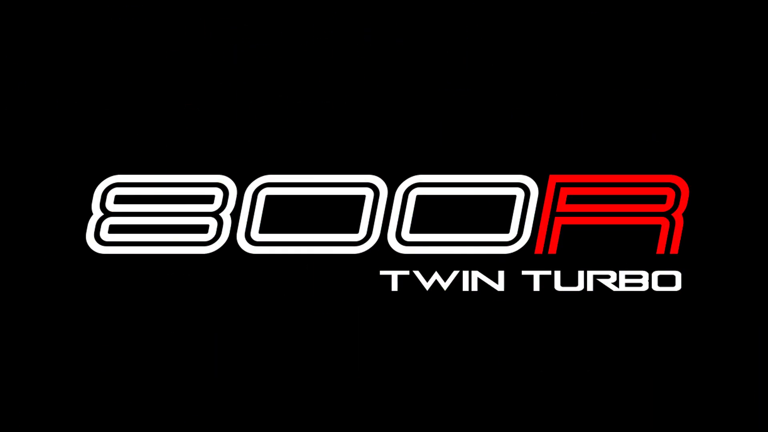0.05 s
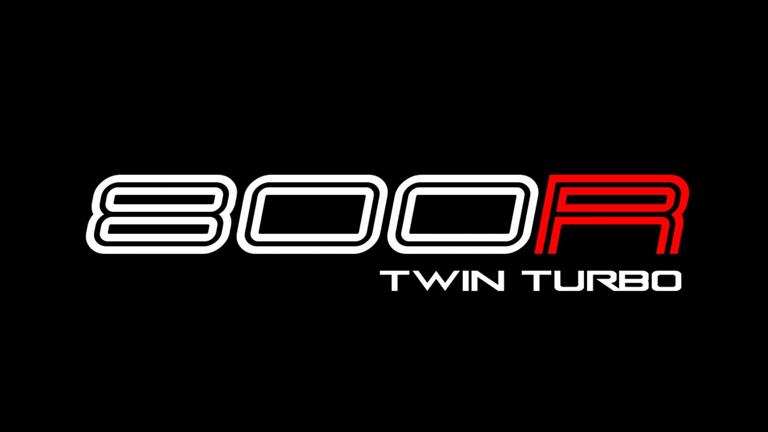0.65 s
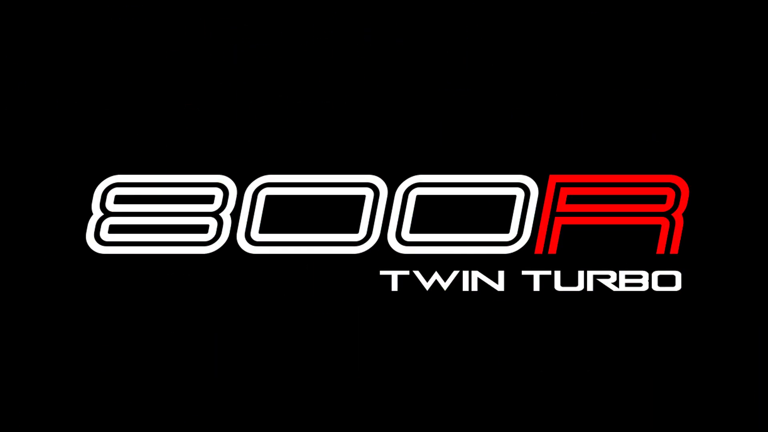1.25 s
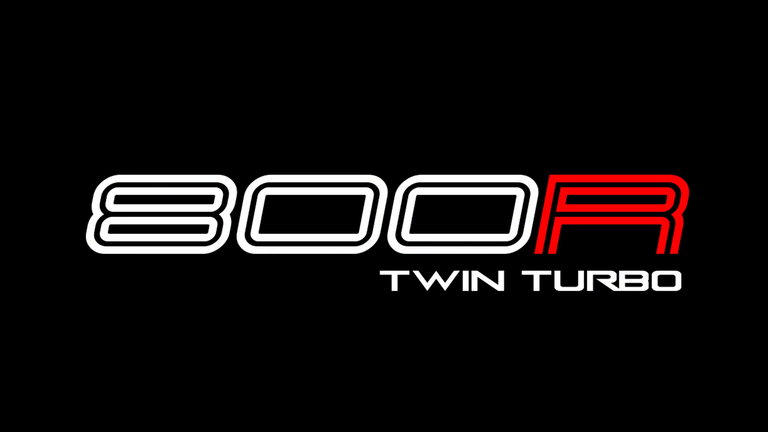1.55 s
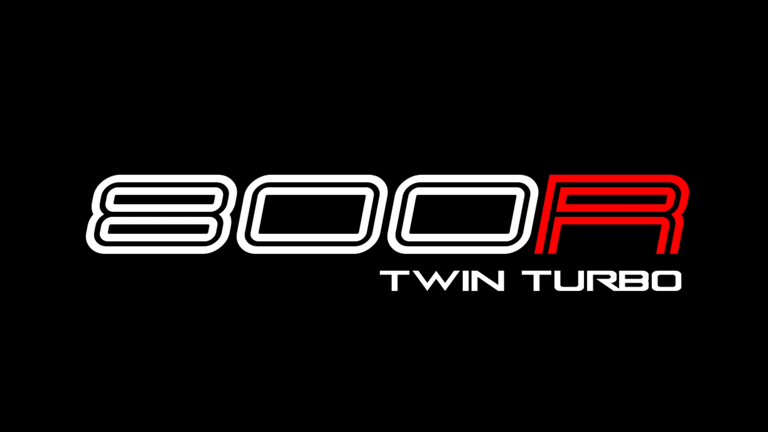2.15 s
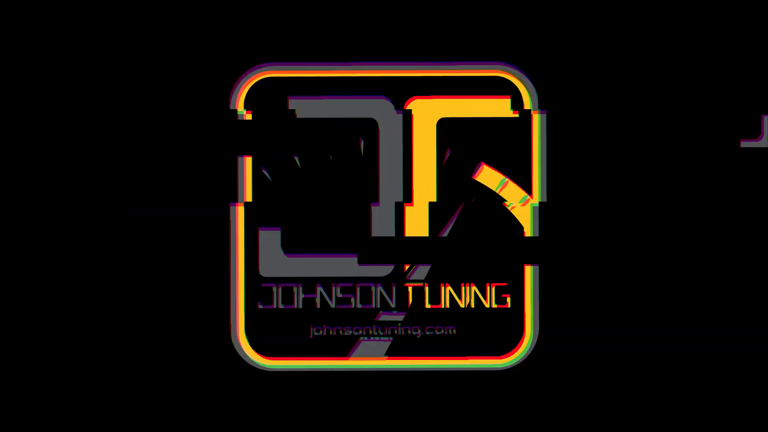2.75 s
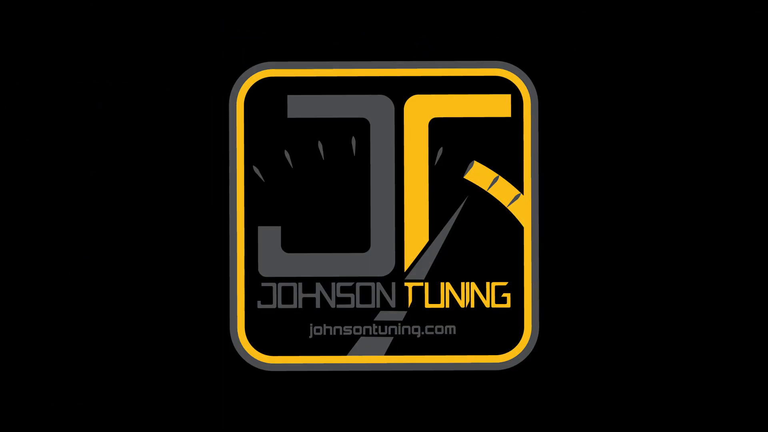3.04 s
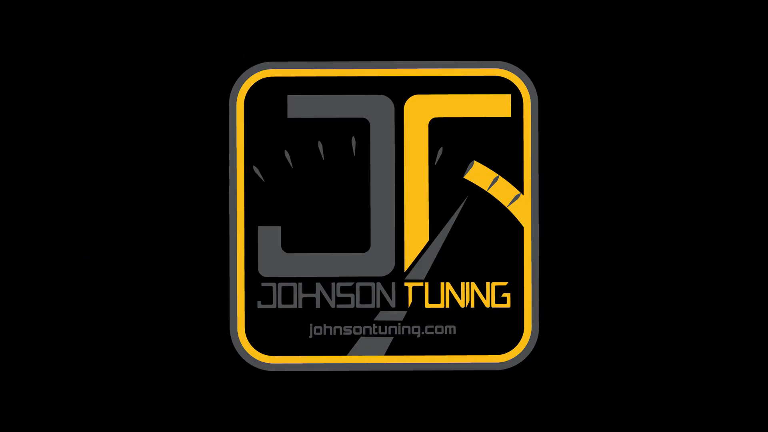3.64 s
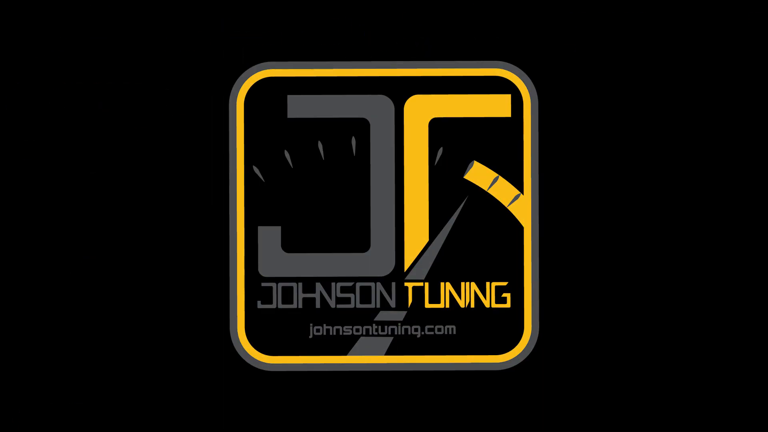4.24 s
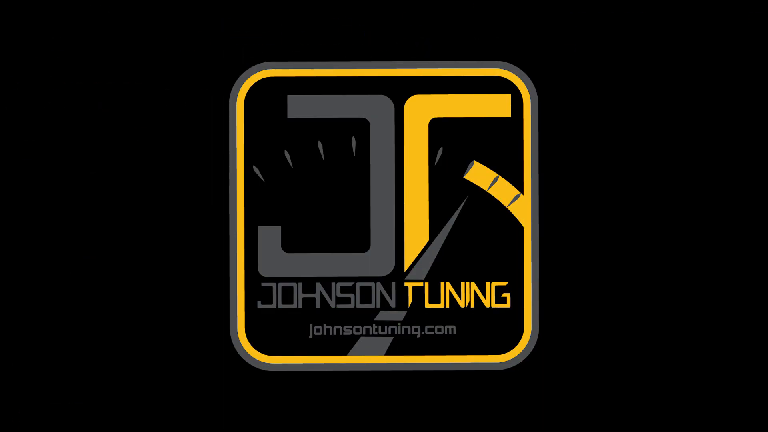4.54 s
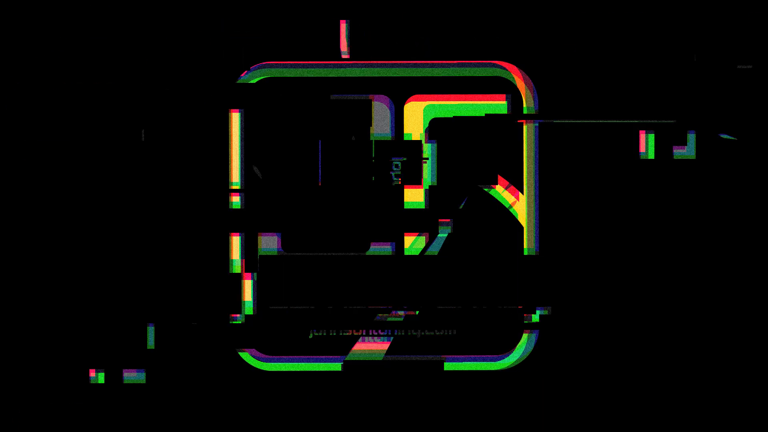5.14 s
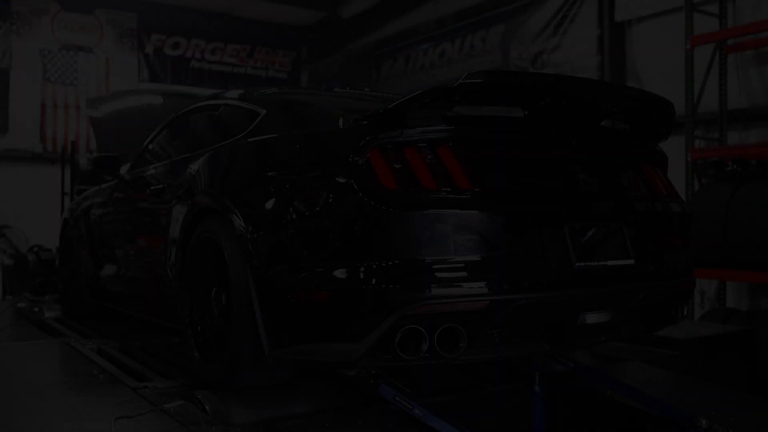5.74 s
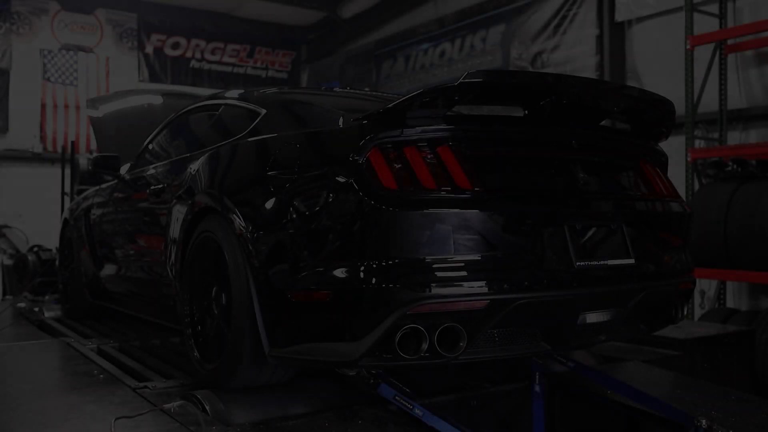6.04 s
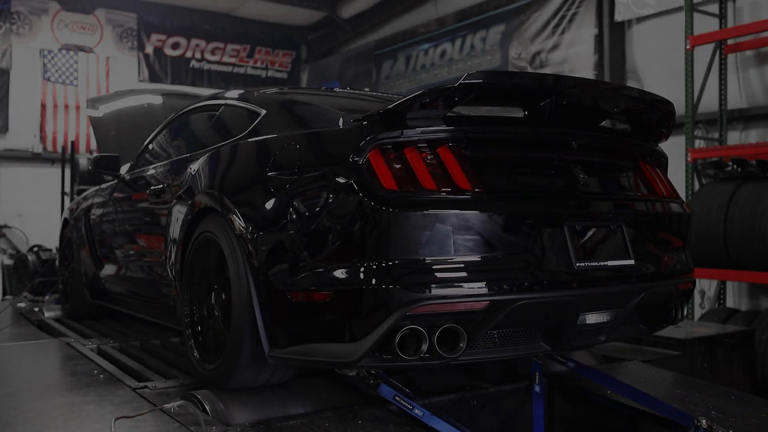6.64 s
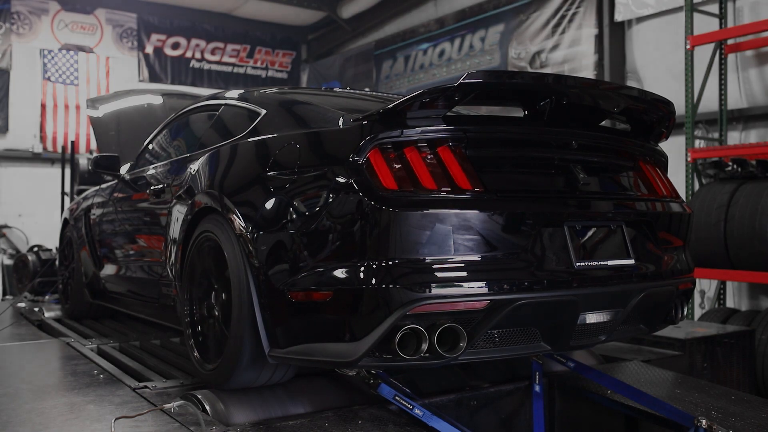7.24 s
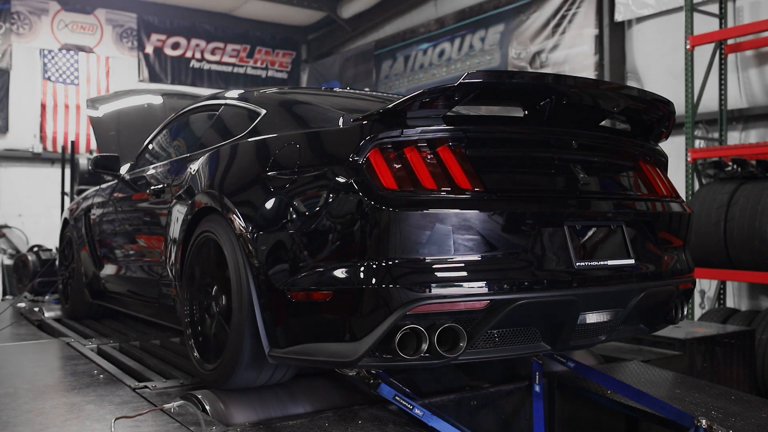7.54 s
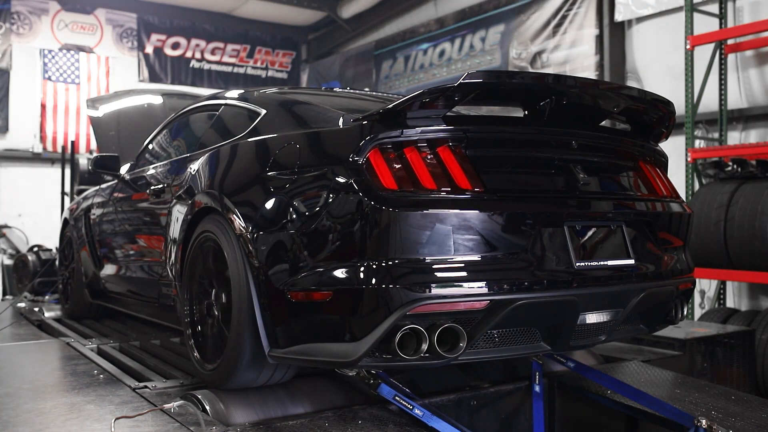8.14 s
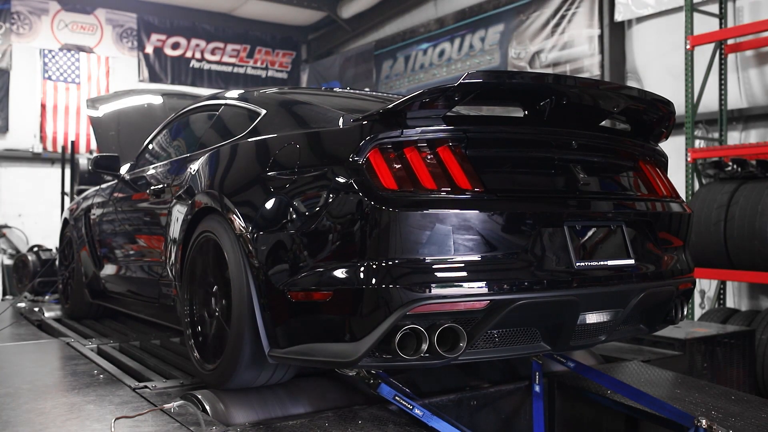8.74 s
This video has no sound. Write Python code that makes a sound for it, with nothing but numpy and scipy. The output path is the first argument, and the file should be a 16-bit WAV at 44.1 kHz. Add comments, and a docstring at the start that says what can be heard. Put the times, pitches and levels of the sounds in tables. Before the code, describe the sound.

A turbocharged V8 car runs on a workshop dyno, heard close behind the tailpipes. It climbs from a low burble to a barking roar, then lifts off with a whoosh of boost and three pops. A second, longer pull ends in a big backfire that overloads the microphone. The engine then settles to a light load and drops lower, while tyres whine on the rollers and the turbos whistle faintly.

```python
"""A turbocharged V8 lugs at low revs, then pulls hard twice on a workshop dyno, heard behind the tailpipes.
Its firing pulses make a deep, burbling note and ring the pipes into a bark and a metallic rasp.
Each throttle lift stumbles and vents boost; on the first two, fuel pops in the pipes, once as a big backfire.
Then it settles to a light load. Underneath, tyres whine on the rollers and the turbos whistle faintly.
The loudest peaks overload the microphone."""
import sys
import numpy as np
from scipy import signal
from scipy.fft import rfft, irfft, next_fast_len
from scipy.io import wavfile
from scipy.ndimage import uniform_filter1d

SR = 44100
rng = np.random.default_rng(int(sys.argv[2]) if len(sys.argv) > 2 else 0)


def master(y):
    """Save y as 16-bit WAV."""
    cut = np.clip(np.atleast_2d(y).T, -1, 1)
    pcm = np.round(cut * 32767)  # scale
    wavfile.write(sys.argv[1], SR, pcm.astype(np.int16))


N = 396459
TIME = np.arange(N) / SR

# how hard the engine works: (time [s], low note level [dB], bark level [dB])
ENGINE_EFFORT = [(0, -32.5, -33), (.25, -29, -31), (.5, -19, -27), (.72, -12.5, -17), (.95, -13.5, -15),
                 (1.1, -11.5, -13), (1.25, -8.5, -5.5), (1.42, -6.5, -11), (1.65, -11, -12.5),
                 (1.92, -13.5, -13.5), (2.03, -21, -26), (2.48, -26, -30), (2.62, -17.5, -25),
                 (3.0, -19, -27.5), (3.2, -15.5, -21), (3.35, -14.5, -22.5), (3.65, -11.5, -14),
                 (4.05, -10.5, -16), (4.55, -11.5, -15), (5.32, -16, -16), (5.47, -19, -26),
                 (5.85, -20, -34.5), (5.99, -14, -18.5), (6.3, -21, -30.5), (6.6, -16.5, -27.5),
                 (7.3, -16, -27.5), (7.4, -27.5, -33), (7.5, -21, -31), (7.8, -29.5, -55), (8.15, -28, -41),
                 (8.42, -23, -33), (8.7, -27, -37), (8.99, -25.5, -58)]
# the eight cylinders in firing order: (pulse strength [dB], delay down the pipe [firing periods])
CYLINDER_PULSES = [(4, 0.0506), (4.5, -0.009), (-3.6, 0.048), (-1, -0.238), (6, 0.004), (-0.5, 0.042),
                   (3.5, 0.0564), (-2.8, 0.076)]


def from_db(db):
    """Decibels to gain."""
    return 10 ** (np.asarray(db) / 20)


def rms_one(x):
    """Scale to unit power."""
    return x / np.sqrt(np.mean(x ** 2) + 1e-20)


def levelled(x):
    """Hold the power at one over a tenth of a second, keeping the single pulses."""
    return x / np.sqrt(np.abs(uniform_filter1d(x ** 2, SR // 10)) + 1e-12)


def in_time(rows):
    """Each column of an automation table at every sample."""
    times, *columns = np.transpose(rows)
    return [np.interp(TIME, times, column) for column in columns]


def drift(rate_hz):
    """Smooth random wander of spread one."""
    step, settle = 40, 2000
    pole = np.exp(-2 * np.pi * rate_hz * step / SR)
    white = rng.standard_normal(N // step + settle + 2)
    slow = signal.lfilter([1], [1, -2 * pole, pole * pole], white)[settle:]
    return np.interp(np.arange(N) / step, np.arange(len(slow)), rms_one(slow))


def noise(spectrum, flow=1):
    """Turbulence at unit power that follows a flow; its colour rolls off past the last point."""
    size = next_fast_len(N)
    hz, db = np.transpose(spectrum)
    bins = np.arange(size // 2 + 1) * SR / size + 1
    colour = from_db(np.interp(np.log(bins), np.log(hz), db)) * np.minimum(1, hz[-1] / bins) ** 2
    return rms_one(irfft(rfft(rng.standard_normal(N) * flow, size) * colour, size)[:N])


def workshop(x, wet_db, t60_s=.34):
    """Direct sound plus a dense tail of wall reflections."""
    t = TIME[:SR // 2]
    tail = rng.standard_normal(len(t)) * from_db(-60 * t / t60_s) * (t > .004)
    return x + from_db(wet_db) * signal.fftconvolve(x, tail / np.linalg.norm(tail))[:N]


def whistle(hz, harmonic_db, wander_hz, rate_hz):
    """A tone and its harmonics, blurred by fast wander of the pitch."""
    phase = 2 * np.pi * np.cumsum(hz + wander_hz * drift(rate_hz)) / SR
    return np.sqrt(2) * sum(from_db(db) * np.sin(k * phase) for k, db in enumerate(harmonic_db, 1))


def dyno_rollers():
    """Two tyres roar and whine on the rollers, slightly out of tune with each other."""
    # tyres on the rollers: (time [s], whine pitch [Hz], whine level [dB], roar level [dB])
    rolling = [(0, 2360, -43, -34.5), (1, 2320, -61, -26.5), (2.2, 2470, -58, -32), (2.45, 2380, -65, -42),
               (2.6, 1410, -59, -35), (3.1, 1460, -51, -32.5), (3.5, 1576, -44, -30),
               (4.5, 1840, -40, -29.5), (5.35, 2050, -40.5, -27), (5.8, 1980, -36.5, -30.5),
               (7.3, 2159, -37.5, -30), (8.2, 2151, -36.5, -29.5), (8.6, 2150, -35.5, -30),
               (8.99, 2225, -36, -29.5)]
    # whine harmonics, fundamental first: (level [dB])
    harmonics = [0, -7, -12, -14, -17, -27]
    # rolling roar: (frequency [Hz], level [dB])
    roar_colour = [(30, -42), (50, -26), (70, -4), (200, -15), (500, 2.5), (1000, -4), (1500, -8),
                   (2000, -7), (2800, -13.5), (3500, -9.5), (5000, -18.5), (9000, -28), (12000, -35.5),
                   (16000, -43)]
    hz, whine_db, roar_db = in_time(rolling)
    whine = whistle(hz, harmonics, wander_hz=34, rate_hz=190)
    whine += whistle(hz * .992, harmonics, wander_hz=75, rate_hz=400)
    return from_db(whine_db - 3.5) * whine + from_db(roar_db) * noise(roar_colour)


def turbo():
    """A breathy whistle that rises on boost and runs down slowly."""
    # turbo whistle: (time [s], pitch [Hz], level [dB])
    spool = [(0, 1720, -56), (3.6, 1920, -55), (4.5, 2330, -32.5), (5.2, 2467, -31), (5.5, 2380, -28),
             (5.95, 2066, -57), (6.5, 1994, -57), (7.35, 1730, -36), (7.6, 1816, -36.5), (8.2, 1765, -43),
             (8.99, 1678, -39)]
    hz, db = in_time(spool)
    return from_db(db - 1 + 2 * drift(6)) * whistle(hz, [0], wander_hz=55, rate_hz=130)


def throttle_lifts(shut_s=.06, reopen_s=.1):
    """How far the throttle is shut (0-1), and the gains of the whoosh and stumble that come with it."""
    # foot off the throttle: (shuts [s], reopens [s], whoosh level [dB], stumble level [dB])
    lifts = [(1.952, 2.483, -31, -24.5), (5.336, 5.831, -27.5, -29.5), (7.301, 7.353, -44, -22),
             (7.437, 7.667, -37.5, -32.5)]
    shut = whoosh = stumble = 0
    for shuts, reopens, whoosh_db, stumble_db in lifts:
        gate = np.clip((TIME - shuts) / shut_s, 0, 1) * np.clip(1 - (TIME - reopens) / reopen_s, 0, 1)
        shut += gate
        whoosh += from_db(whoosh_db) * gate
        stumble += from_db(stumble_db) * gate
    return shut, whoosh, stumble


def boost_vent():
    """Boost air whooshes out while the throttle is shut."""
    # venting air: (frequency [Hz], level [dB])
    vent_colour = [(1200, -61), (1900, -42), (2200, 12.5), (2450, 9), (2800, 1), (3400, 4), (4500, -27)]
    _, whoosh, _ = throttle_lifts()
    return whoosh * noise(vent_colour)


def firing_pulses(firings, rough, scatter_db=2, jitter_periods=.01):
    """One impulse per firing; rough running scatters their strength and timing."""
    number = np.arange(1, int(firings[-1]) - 1)
    strength_db, lag = np.array(CYLINDER_PULSES)[number % 8].T
    steep_db = 4 * (number % 8 == 0)  # one cylinder's front is steeper than the others'
    slip, swell = rng.standard_normal((2048, 2))[number].T * np.interp(number, firings, rough)
    arrivals = np.interp(number + lag + jitter_periods * slip, firings, np.arange(N)).astype(int)
    pulses = np.zeros(N)
    pulses[arrivals] = from_db(strength_db + steep_db + scatter_db * swell)
    return pulses + 1e-18


def puffs(pulses, decay_s, steady):
    """Gas flow: each pulse dies away over a steady stream."""
    return rms_one(signal.lfilter([1], [1, -np.exp(-1 / (decay_s * SR))], pulses)) + steady


def exhaust_hiss(pulses, push_db):
    """Gas hisses from the pipes; under load the strongest pulses add a sharp, overloaded crackle."""
    # rushing gas: (frequency [Hz], level [dB])
    gas_colour = [(1200, -25), (2500, 4), (4200, 3), (5000, 1), (6500, -3), (8000, -16.5), (10000, -13.5),
                  (13000, -30), (16000, -46)]
    _, whoosh, _ = throttle_lifts()
    crackle = levelled(noise(gas_colour, puffs(pulses ** 2, decay_s=.0007, steady=.04)))
    crackle_gain = from_db(-52.5 + 1.68 * push_db)  # grows much faster than the bark
    hiss = noise(gas_colour, puffs(pulses, decay_s=.0021, steady=1.2))
    hiss_gain = np.hypot(from_db(-50.5 + .34 * push_db), from_db(-11.5) * whoosh)
    return hiss_gain * hiss + crackle_gain * crackle


def pipe(x, modes, band_hz):
    """Parallel resonances of alternating sign inside a pass band."""
    out = 0
    for k, (hz, width_hz, db) in enumerate(modes):
        radius = np.exp(-np.pi * width_hz / SR)
        feed = np.array([1, 0, -1]) * (1 - radius ** 2) / 2
        feedback = [1, -2 * radius * np.cos(2 * np.pi * hz / SR), radius ** 2]
        out += (-1) ** k * from_db(db) * signal.lfilter(feed, feedback, x)
    return signal.sosfilt(signal.butter(4, band_hz, "band", fs=SR, output="sos"), out)


def pipe_ring(fronts, turbulence, lug_hz):
    """At low revs one pipe resonance rings out on its own."""
    # the lone resonance: (frequency [Hz], width [Hz], level [dB])
    mode = [(1270, 130, 0)]
    ring = pipe(turbulence + .5 * fronts, mode, band_hz=(1080, 1460))
    return from_db(-35) * np.minimum(lug_hz / 20, 1) * levelled(ring)


def pipe_rasp(fronts, turbulence, rough):
    """Pulse fronts and turbulence excite the high pipe modes: a metallic rasp."""
    # high pipe resonances: (frequency [Hz], width [Hz], level [dB])
    modes = [(1827, 140, 1), (2398, 260, 3), (2574, 283, 2), (3293, 275, -1.5), (3693, 430, -8)]
    rasp = pipe(fronts + 3.7 * rough * turbulence, modes, band_hz=(1400, 4600))
    return levelled(workshop(rasp, wet_db=-5.5))


def pipe_bark(fronts, turbulence, rough):
    """The steep edge of each front barks in the midrange pipe modes."""
    # midrange pipe resonances: (frequency [Hz], width [Hz], level [dB])
    modes = [(615, 48, 2.5), (808, 207, -4.5), (1010, 113, 5), (1071, 266, 2), (1304, 216, -3)]
    edges = signal.sosfilt(signal.butter(2, 700, "high", fs=SR, output="sos"), fronts)
    bark = pipe(edges + .4 * rough ** 2 * turbulence, modes, band_hz=(558, 1450))
    return levelled(workshop(bark, wet_db=3.5))


def tailpipes(pulses, rough, spin_up, lug_hz):
    """The bright voice: pulse fronts and the turbulence behind them bark, rasp, ring and hiss."""
    _, bark_db = in_time(ENGINE_EFFORT)
    push_db = bark_db + 20  # effort above a moderate load
    shut, _, _ = throttle_lifts()
    fronts = levelled(pulses)
    turbulence = levelled(rng.standard_normal(N) * puffs(pulses, decay_s=.0026, steady=.4))
    bark = from_db(bark_db - 3) * pipe_bark(fronts, turbulence, rough)
    rasp_db = -29.5 + .74 * push_db + spin_up + .11 * lug_hz + 5 * shut
    rasp = from_db(rasp_db) * pipe_rasp(fronts, turbulence, rough)
    return bark + rasp + pipe_ring(fronts, turbulence, lug_hz) + exhaust_hiss(pulses, push_db)


def backfires():
    """Fuel ignites in the pipes: a boom with a thump under it and a crack on top, echoing in the shop."""
    # pops: (time [s], level [dB], crack against boom [dB], decay t60 [s], thump level [dB], attack [s])
    pops = [(1.983, -15, -35, .1, -4, .003), (2.164, -14, -24, .14, -14, .003),
            (2.396, -11, -18, .1, -12, .002), (5.406, -8.5, -20, .08, -20, .002),
            (5.623, 1.5, -26, .045, -20, .0003), (5.642, 3.5, -3, .07, -14, .0002)]
    # the pipe's boom: (frequency [Hz], level [dB])
    boom_colour = [(30, -33), (90, 12), (250, 6.5), (450, 16), (650, -1.5), (850, 7), (1200, 13),
                   (1550, -57), (2400, -8.5), (4000, -7), (9000, -44)]
    # the sharp crack: (frequency [Hz], level [dB])
    crack_colour = [(600, 9), (1800, 11), (3300, 6), (5000, -6.5), (9000, -11.5), (16000, -29)]
    thump_hz, thump_t60_s = 305, .06  # the muffler's low mode
    boom, crack, out = noise(boom_colour), noise(crack_colour), np.zeros(N)
    for start, db, crack_db, t60_s, thump_db, attack_s in pops:
        age = np.maximum(TIME - start, 0)
        blast = from_db(db - 60 * np.minimum(age / t60_s, 2)) * (boom + from_db(crack_db) * crack)
        thump_gain = from_db(thump_db - 60 * np.minimum(age / thump_t60_s, 2))
        thump = thump_gain * np.sin(2 * np.pi * thump_hz * age)
        out += np.minimum(age / attack_s, 1) * (blast + thump)
    return workshop(out, wet_db=-11)


def engine_harmonics(firings, firing_hz, rough, spin_up, waver_db=5):
    """Firing harmonics and the burble of unequal cylinders; each swells as it crosses a standing wave."""
    # standing waves of exhaust and workshop: (frequency [Hz], level [dB])
    standing_waves = [(60, -41), (87, -7.5), (101, -35), (121, -24.5), (150, -8.5), (176, 1.3), (192, -7.5),
                      (209, -14), (222, -7.5), (257, -9), (290, -3), (304, 0.8), (327, -5.5), (367, 0),
                      (418, -8.5), (438, -1.5), (485, -6), (524, -9), (600, -15), (682, -17.5), (779, -6.5),
                      (844, -36), (976, -17.5), (1304, -18)]
    wave_hz, wave_db = np.transpose(standing_waves)
    step, orders = 100, np.arange(3, 44)  # samples per gain update; multiples of the engine cycle rate
    strength_db, lag = np.transpose(CYLINDER_PULSES)
    pattern = np.exp(-2j * np.pi * np.outer(orders, np.arange(8) + lag) / 8) @ from_db(strength_db) / 8
    _, bark_db = in_time(ENGINE_EFFORT)
    tilt_db_per_octave = .19 * (bark_db[::step] + 20)  # brighter under load
    bass_lag_cycles = .94  # low harmonics arrive later
    cycle, out = firings / 8 % 1, 0
    for order, share in zip(orders, pattern):
        hz = order * firing_hz[::step] / 8
        db = np.interp(np.log(hz), np.log(wave_hz), wave_db) + tilt_db_per_octave * np.log2(hz / 300)
        db += spin_up[::step] * (-3 if order % 8 else 1.5)  # on a climb, firing stands out of the burble
        db += waver_db * rough[::step] * drift(14.3)[::step]
        gain = np.interp(TIME, TIME[::step], np.abs(share) * from_db(db))
        phase = 2 * np.pi * (order * cycle - bass_lag_cycles * np.log(order)) + np.angle(share)
        out += gain * np.cos(phase.astype(np.float32))
    return np.sqrt(2) * out


def exhaust_note(firings, firing_hz, rough, spin_up, pulses):
    """The low voice: harmonics, a drone at low revs, one bank's thud on a lift and lumpy burning."""
    # puffs of uneven burning: (frequency [Hz], level [dB])
    stumble_colour = [(25, -38), (45, -37.5), (62, -29), (80, -9), (100, 7), (135, -15.5), (180, 4.5),
                      (300, 1.5), (450, 5), (560, -28.5), (750, 1), (1100, -41)]
    drone_hz, drone_width_hz = 111, 10  # the exhaust booms when the firing rate sits on this resonance
    note_db, _ = in_time(ENGINE_EFFORT)
    shut, _, lift_stumble = throttle_lifts()
    note = from_db(note_db - 1.73 - 1.8 * shut) * engine_harmonics(firings, firing_hz, rough, spin_up)
    drone_gain = from_db(-22) * np.exp(-((firing_hz - drone_hz) / drone_width_hz) ** 2)
    drone = drone_gain * np.sin(2 * np.pi * firings)
    thud = shut * from_db(-30 + 4 * drift(12)) * np.sin(np.pi * firings + .5 * drift(10))
    stumble = levelled(noise(stumble_colour, puffs(pulses, decay_s=.0066, steady=.65)))
    running_gain = from_db(-36.5 + .083 * (note_db + 15) + 6.5 * spin_up)
    lift_gain = lift_stumble * from_db(2 * drift(14) - .5)
    return note + np.sqrt(2) * (drone + thud) + np.hypot(running_gain, lift_gain) * stumble


def scene():
    """The crank drives the exhaust, rougher on lifts, climbs and low revs, over rollers and turbos."""
    # crank speed, eight firings to an engine cycle: (time [s], firing rate [Hz])
    revs = [(0.0, 103.6), (0.19, 108.8), (0.5, 124.8), (1.0, 171.1), (1.4, 208.8), (1.8, 239.4),
            (1.97, 240.4), (2.2, 212.2), (2.67, 168.8), (2.84, 174.6), (2.99, 174.6), (3.5, 188.4),
            (4.1, 208.6), (4.7, 226.5), (5.35, 242.0), (5.49, 223.1), (5.95, 176.9), (6.07, 172.3),
            (6.21, 180.0), (6.29, 175.2), (6.45, 178.5), (7.33, 185.8), (7.87, 142.3), (7.95, 144.0),
            (8.49, 144.2), (8.99, 147.0)]
    fast_climb_hz_per_s, lug_below_hz = 90, 140
    firing_hz, = in_time(revs)
    shut, _, _ = throttle_lifts()
    climb = uniform_filter1d(np.gradient(firing_hz) * SR, SR // 4)
    spin_up = np.clip(climb / fast_climb_hz_per_s, 0, 1)
    lug_hz = np.maximum(lug_below_hz - firing_hz, 0)
    rough = .27 + .16 * spin_up + .62 * shut + .009 * lug_hz  # unevenness of burning
    crank_wobble = (.008 * rough ** 2 + .03 * shut) * drift(30)
    firings = np.cumsum(firing_hz * (1 + crank_wobble)) / SR
    pulses = firing_pulses(firings, rough)
    engine = exhaust_note(firings, firing_hz, rough, spin_up, pulses)
    engine += tailpipes(pulses, rough, spin_up, lug_hz)
    return (engine + boost_vent() + backfires() + dyno_rollers() + turbo())[None]


def record(dry, cutoff_hz=16000):
    """The loudest peaks overload the microphone and clip flat; the top is cut."""
    lowpass = signal.ellip(10, .1, 70, cutoff_hz, fs=SR, output="sos")
    return signal.sosfilt(lowpass, np.clip(dry, -1, 1))


dry = scene()
out = record(dry)
master(out)
```